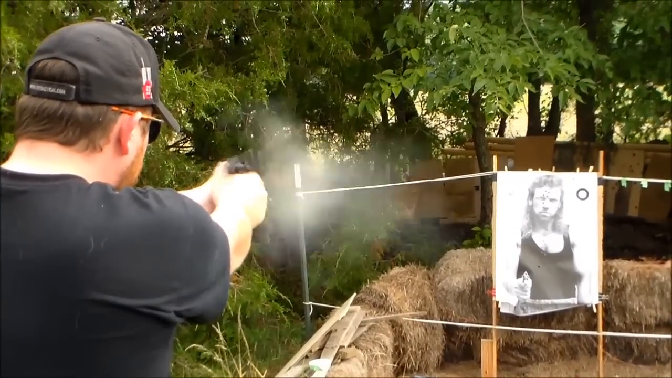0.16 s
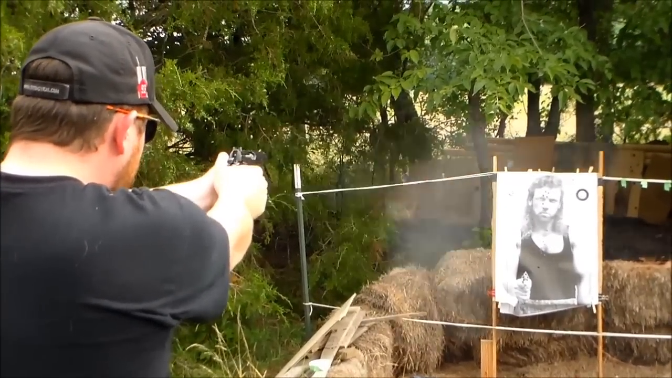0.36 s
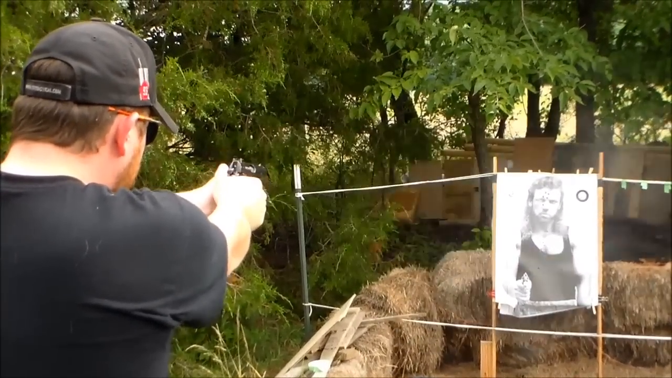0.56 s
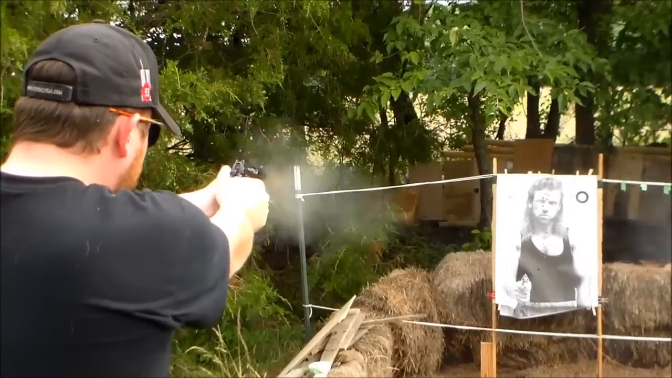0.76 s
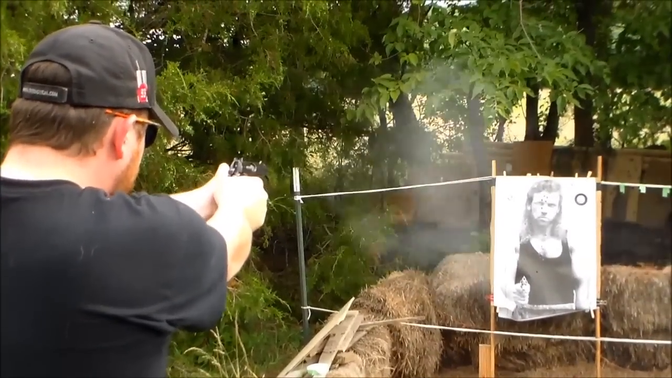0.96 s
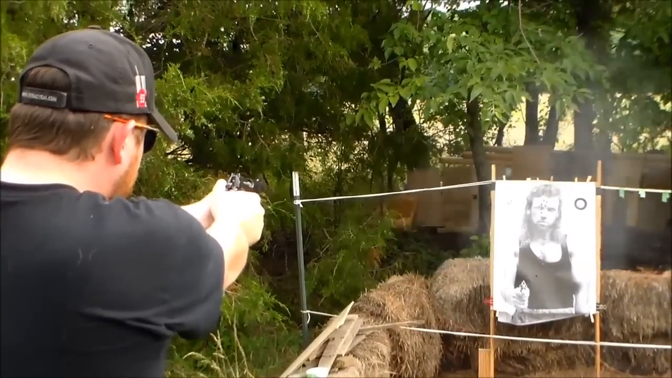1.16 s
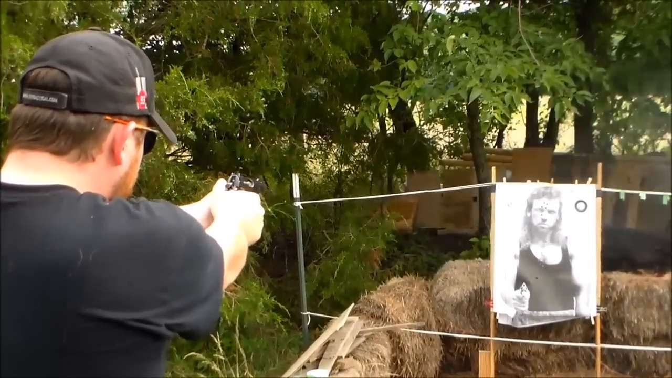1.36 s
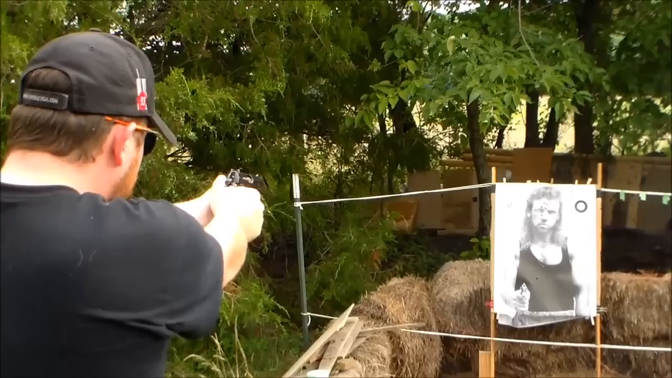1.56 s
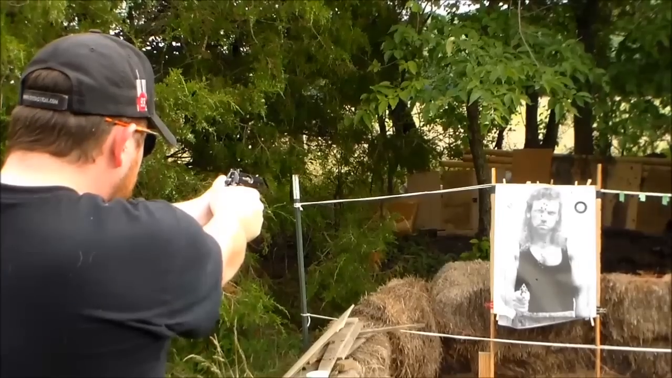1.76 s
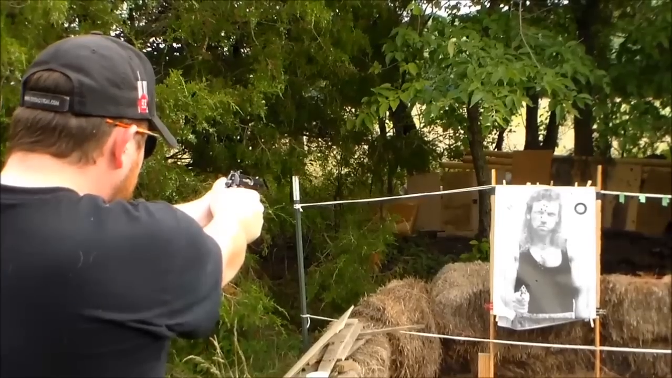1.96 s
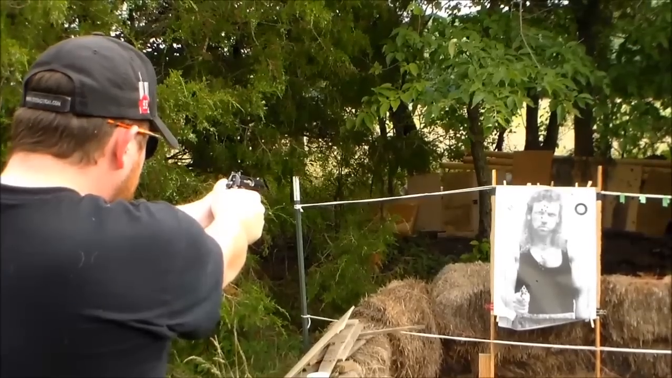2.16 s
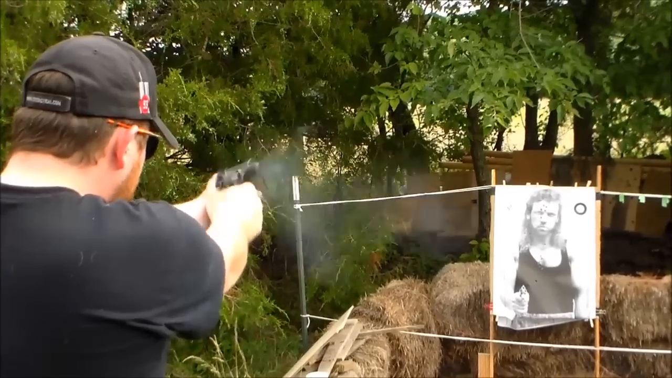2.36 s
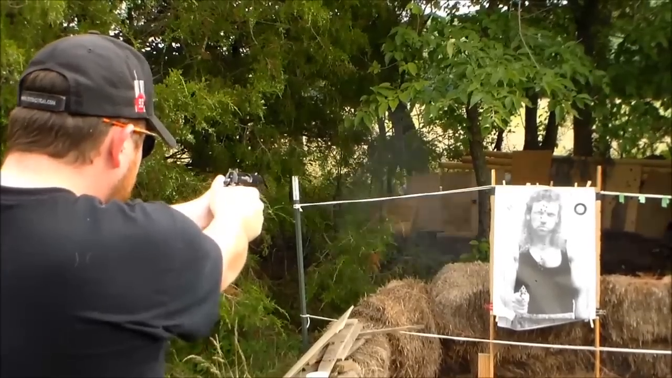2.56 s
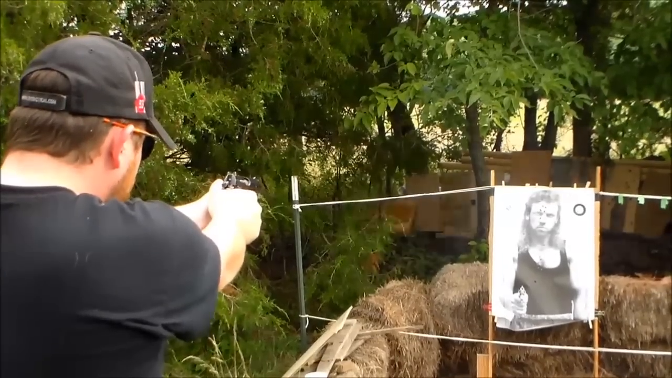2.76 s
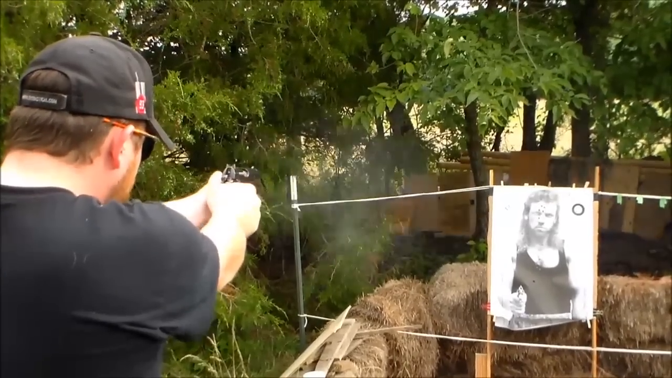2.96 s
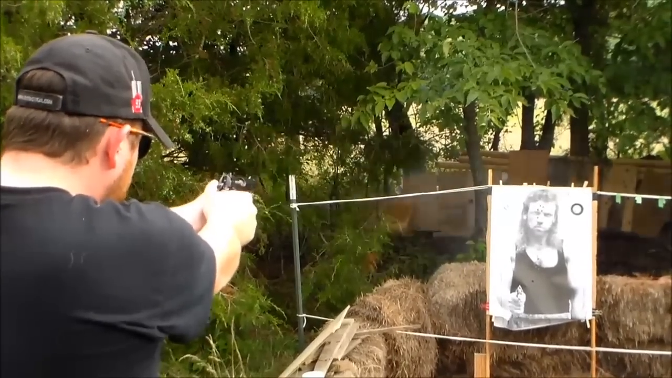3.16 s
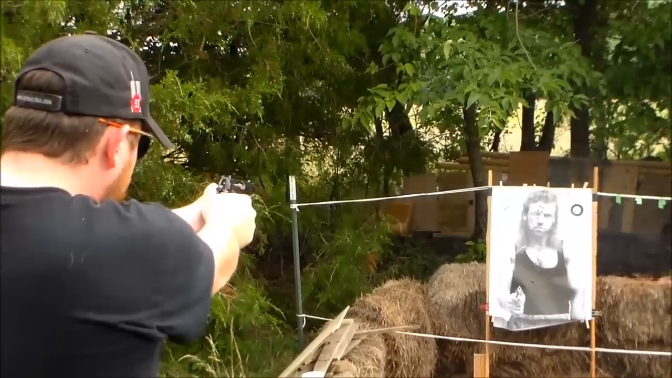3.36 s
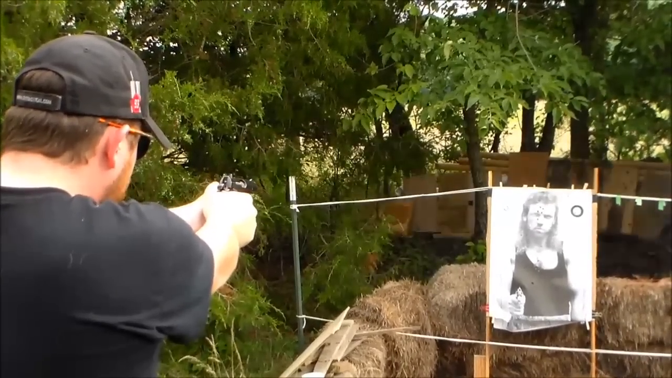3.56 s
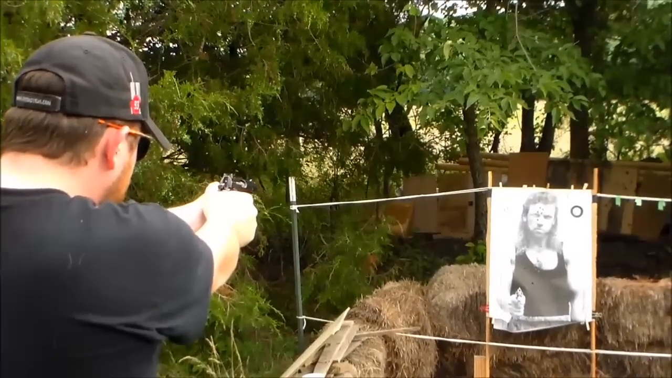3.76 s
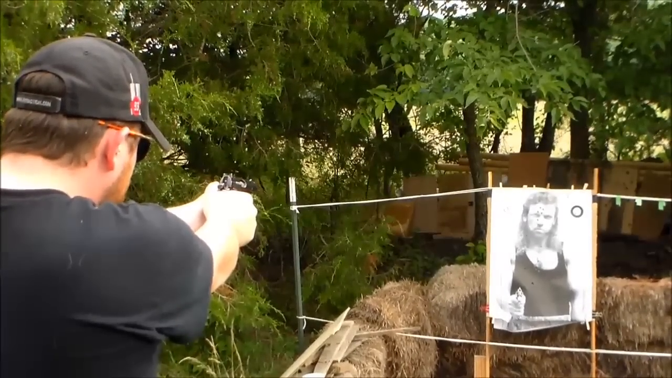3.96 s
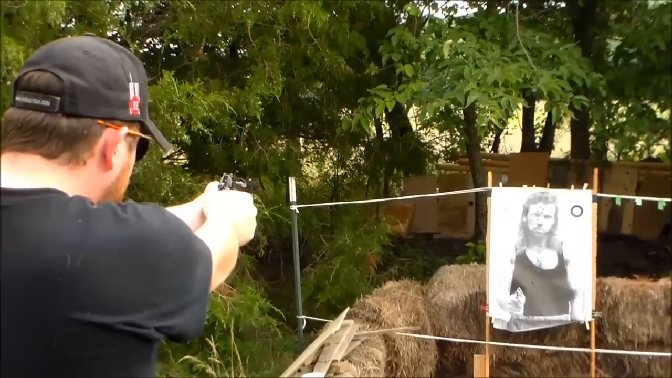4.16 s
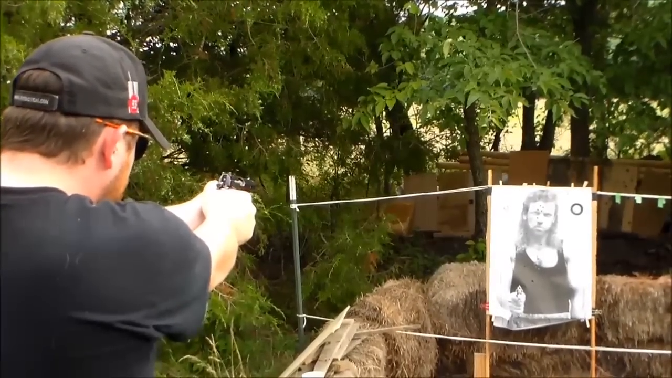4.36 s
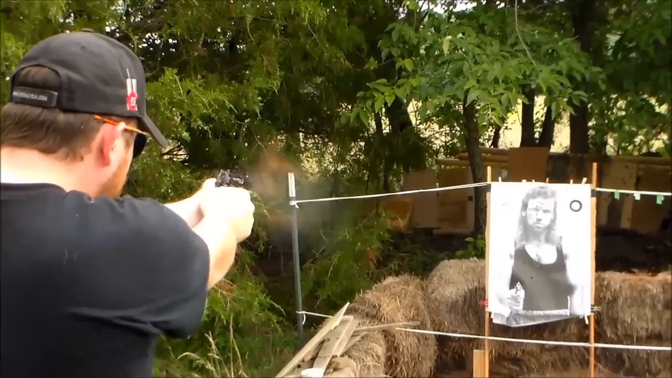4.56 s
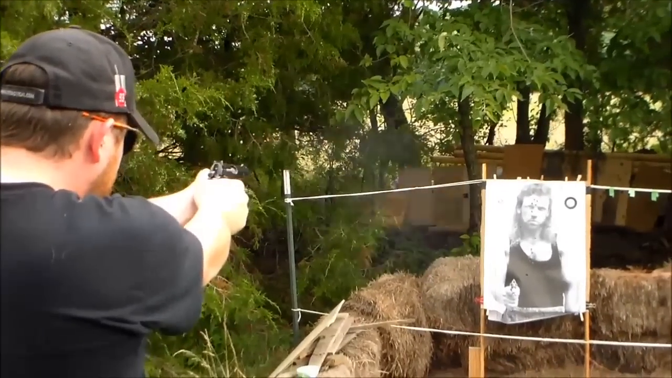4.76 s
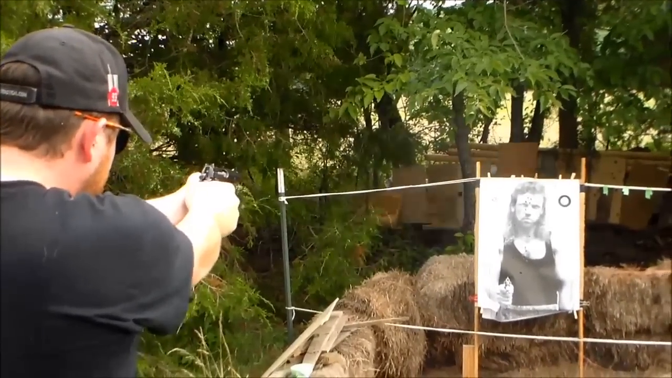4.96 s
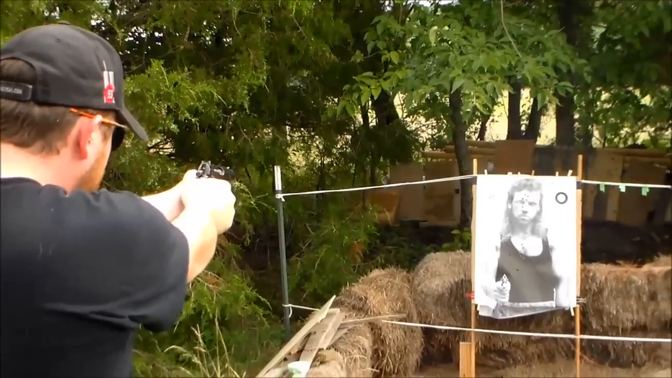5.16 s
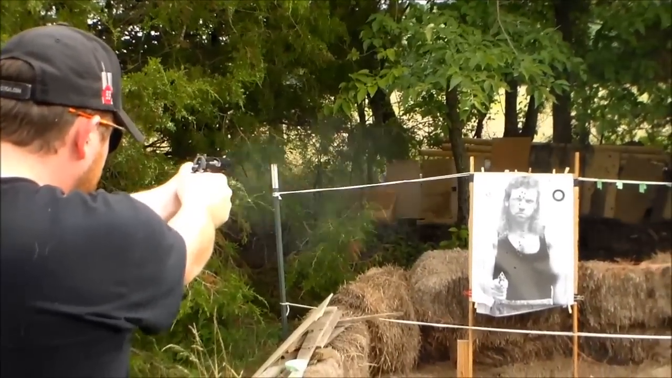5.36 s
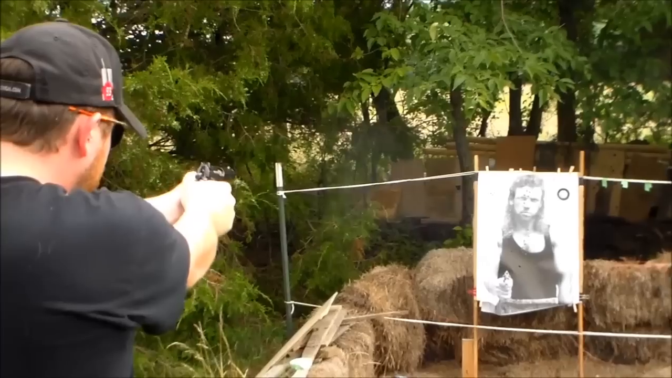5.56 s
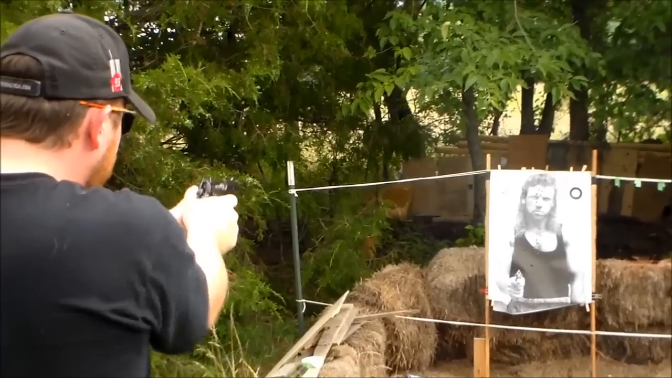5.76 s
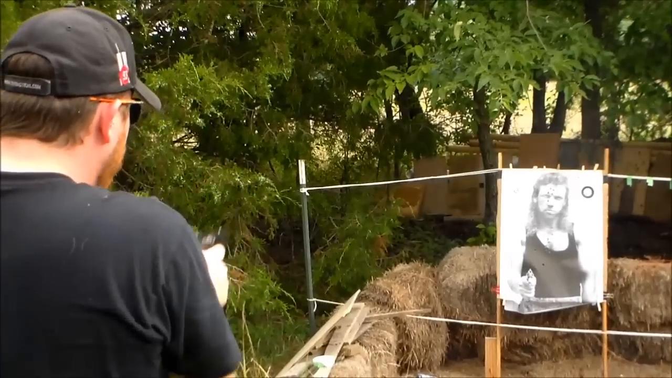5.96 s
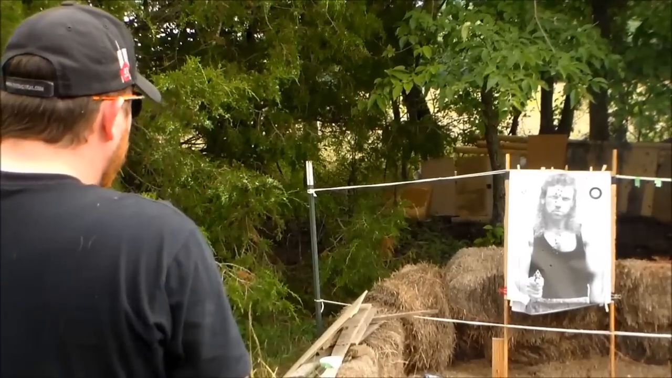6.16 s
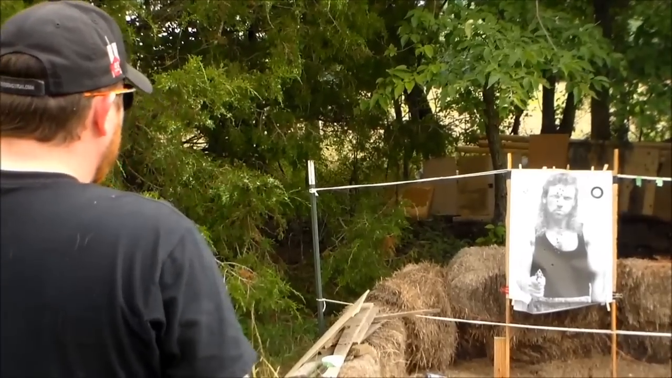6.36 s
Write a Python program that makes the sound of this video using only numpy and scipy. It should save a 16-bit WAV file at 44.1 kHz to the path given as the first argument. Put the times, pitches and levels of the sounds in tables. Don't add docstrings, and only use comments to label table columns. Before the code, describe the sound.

Six distorted handgun shots, grouped in twos, slap back from bank, trees and far wall, with light wind, leaf rustle and a faint brass tick between.

```python
import sys
import numpy as np
from scipy import signal
from scipy.fft import rfft, irfft, next_fast_len
from scipy.io import wavfile
from scipy.ndimage import uniform_filter1d

SR = 44100
rng = np.random.default_rng(int(sys.argv[2]) if len(sys.argv) > 2 else 0)


def unload_audio(sound):
    columns = np.transpose(np.atleast_2d(sound))
    steps = np.round(np.clip(columns, -1, 1) * 32767)
    wavfile.write(sys.argv[1], SR, steps.astype(np.int16))


def boost(x):
    u = np.asarray(x, float) / 20
    return 10 ** u


N = 286473

# start in seconds, input bias kick left and right in full scale,
# kick by the first echo left and right in full scale.
SHOTS = [
    (0.3418, -0.81, -0.33, 0.17, -0.14),
    (0.953, -0.26, -0.42, 0.0069, 0.0032),
    (2.53, -1.07, -0.87, 0.28, 0.34),
    (3.0816, -0.71, -0.47, 0.11, 0.06),
    (4.7554, -0.62, -0.76, 0.17, 0.21),
    (5.4909, -0.57, -0.5, 0.14, 0.064),
]
# frequency in Hz, level in dB per Hz.
BLAST = [(88, -53.5), (150, -27), (273, -19.5), (416, -8.5), (459, -9.5), (535, -3), (991, -3.5),
         (1460, -7), (2020, -13.5), (2550, -9.5), (3540, -13), (6810, -23), (11200, -25), (13900, -35),
         (15000, -61.5)]
# frequency in Hz, side minus mid in dB.
WIDTH = [(60, -9.5), (110, -18.5), (200, -10), (380, -19.5), (700, -17), (1280, -13.5), (2370, -11.5),
         (4370, -4.5), (8060, 0), (14900, 3)]
CENTRES = 125 * 2 ** np.arange(0, 7.1, .5)
LEFT_RIGHT = np.array([[1], [-1]])


def on_log(table, hz):
    table_hz, value = np.transpose(table)
    return np.interp(np.log(np.maximum(hz, 1)), np.log(table_hz), value)


def bands(table, size):
    hz = np.fft.rfftfreq(size, 1 / SR)
    octaves = np.log2(np.maximum(hz, 1) / CENTRES[:, None])
    mask = np.cos(np.pi * np.clip(octaves, -.5, .5)) * boost(on_log(table, hz))
    noise = irfft(mask * rfft(rng.standard_normal((len(CENTRES), size))), size)
    return noise / np.sqrt(np.mean(mask ** 2, axis=1).sum())


def walk(rate):
    hold = int(SR / rate)
    levels = np.repeat(rng.standard_normal(N // hold + 1), hold)
    return 0.99 * uniform_filter1d(levels, hold)[:N]


def add(out, s, sound):
    i = int(s * SR)
    out[:, i:i + sound.shape[-1]] += sound[..., :N - i]


def leaves():
    # frequency in Hz, level in dB per Hz.
    leaf_colour = [(350, -22), (500, -3), (800, -1), (1300, -6), (2000, -8.5), (2700, -10.5), (3400, -4.5),
                   (5400, -6.5), (7100, -16.5), (10000, -18), (13500, -23.5), (15000, -25.5)]
    # time in seconds, level in dB.
    rustle = [
        (0, -59.5),
        (0.501, -57),
        (2.2, -57.5),
        (4.3, -57.5),
        (6.5, -54),
    ]
    mid, side = (bands(leaf_colour, N) * boost([1.4 * walk(26) for _ in CENTRES]) for _ in range(2))
    wide = boost(on_log(WIDTH, CENTRES) + 3.0)[:, None]
    level = boost(np.interp(np.arange(N) / SR, *np.transpose(rustle)))
    return level * (mid.sum(axis=0) + LEFT_RIGHT * (wide * side).sum(axis=0))


def wind():
    # time in seconds, level in dB.
    strength = [(0.0, -41), (.15, -50.5), (.5, -46.5), (1.2, -44), (1.75, -51.5), (1.93, -50),
                (2.05, -42.5), (2.46, -41.5), (2.95, -51), (3.3, -43), (3.9, -58.5), (4.15, -46.5),
                (4.7, -45), (5.2, -47), (5.42, -43), (5.9, -51.5), (6.2, -38.5), (6.5, -36.5)]
    # centre in seconds, half length in seconds, dB over the wind (negative for
    gusts = [(0.179, 0.011, 10.5), (2.198, 0.027, 3.5), (2.28, 0.02, -12), (4.173, 0.016, 1.5),
             (4.319, 0.0083, 6.5), (4.4, 0.026, -6), (6.336, 0.033, -8)]
    # frequency in Hz, level in dB per Hz.
    rumble = [(12, -31.5), (20, 3.5), (150, -1), (198, -7.5), (248, -11.5), (300, -20.5), (400, -17),
              (520, -46), (880, -120)]
    # start in seconds, peak in dB, pitch in Hz, left minus right in dB.
    buffets = [(0.171, -37.5, 172, 21), (2.225, -36, 133, 23), (2.309, -37.5, 151, 20),
               (2.439, -43, 136, 15), (6.291, -30.5, 244, 13), (6.404, -27, 293, 21.5),
               (6.416, -46, 164, 5), (6.46, -29, 171, 14)]
    t = np.arange(N) / SR
    db = np.interp(t, *np.transpose(strength))
    for s, half, over_db in gusts:
        db = db + over_db * np.exp(-((t - s) / half) ** 2)
    pan_db = 5.5 + .6 * (db + 47)

    noise = rng.standard_normal((2, N)) + .5 * rng.standard_normal(N)
    low = irfft(rfft(noise) * boost(on_log(rumble, np.fft.rfftfreq(N, 1 / SR))), N)
    rasp = signal.sosfilt(signal.butter(2, [170, 480], "bandpass", fs=SR, output="sos"), noise)
    rasp_gain = boost(4.8 * (db + 35.5) + 1)
    lumps = boost([2.4 * walk(30), 5 * walk(28)])
    out = low / low.std() + rasp / rasp.std() * rasp_gain
    out = out * lumps * boost(db + 4.0 + LEFT_RIGHT * pan_db / 2)

    u = np.arange(SR // 20) / SR
    for when, peak_db, hz, side_db in buffets:
        flap = -np.sin(2 * np.pi * hz * u) * u * hz * np.exp(-u * hz * 2.47)
        add(out, when, flap * boost(peak_db + 20.5 + LEFT_RIGHT * side_db / 2))
    return out


def brass():
    # start in seconds, peak in dB, left minus right in dB.
    ticks = [
        (2.166, -49, -16),
        (4.3102, -68, -8.5),
    ]
    out = np.zeros((2, N))
    u = np.arange(SR // 20) / SR
    for when, peak_db, side_db in ticks:
        ring = np.sin(2 * np.pi * 9600 * u) * np.exp(-u / 0.0012)
        grit = np.diff(rng.standard_normal(len(u) + 1)) * np.exp(-u / 0.0017)
        add(out, when, (ring + 0.71 * grit) * boost(peak_db + LEFT_RIGHT * side_db / 2))
    return out


def returns(u):
    # arrival in seconds, rise in seconds, hold in seconds,
    # level in dB, decay in dB per second.
    parts = [
        (0, 0.0024, 0.0031, 35.5, 7000.5),
        (.006, .002, 0.0009, 9.5, 301.5),
        (0.028, 0.0039, .002, 5.5, 1398),
        (0.035, .016, 0.016, 5, 127.5),
        (0.247, 0.067, 0.045, -28.5, 20),
        (0.69, .1, .2, -35.5, 13),
        (.775, 0.016, 0.011, -30.5, 455),
        (0.84, 0.019, 0.023, -32.5, 700),
        (0, .0015, .0012, 25, 5998.5),
    ]
    # treble tilt and bass loss, both in dB per octave.
    colours = [(0.8, -10.5), (2.2, -10), (4.4, -3.5), (2, 1), (1.42, 7), (0.56, 7), (4, 23), (6.3, 22),
               (8, 2)]
    start, rise, hold, db, fall_db = np.transpose(parts)[:, :, None]
    onset = np.clip((u - start) / rise, 0, 1) ** 4
    decay_db = fall_db * np.maximum(u - start - rise - hold, 0)
    power = 1e-9 + onset * boost(db - decay_db) ** 2
    total = power.sum(axis=0)
    tilt, bass = np.transpose(colours) @ power / total
    leaf_tilt = 10 * np.minimum(u, .4)
    return 10 * np.log10(total), tilt - leaf_tilt, bass


def slope_db(hz, tilt, bass, delay):
    treble_db = tilt * np.log2(np.maximum(hz / 1000, 1))
    bass_db = bass * np.log2(np.clip(hz / 500, .1, 1))
    air_db = 17 * delay * (hz / 8000) ** 2
    return treble_db + bass_db - air_db


def pulse(db, size=1024):
    fold = irfft(np.log(boost(db)), size)
    fold[1:size // 2] *= 2
    fold[size // 2 + 1:] = 0
    return irfft(np.exp(rfft(fold)), size)


def echoes():
    # delay in seconds, dB over the scatter, extra tilt in dB per octave.
    slaps = [(.8107, 11, 3.5), (.8186, 0, 3.5), (.8699, 11.5, -3), (.8767, 5.5, -9)]
    bank = [(0.031, 24, -5.5), (0.0318, 17.5, -6), (.0336, 11, 0.5)]
    trunks = [(.059, 10, -3), (.068, 7.5, 0), (.078, 5, -1), (.086, 5, -2.5), (.111, 5, -4), (.121, -3, -5),
              (.137, 5, -5), (.15, 7.5, -12.5), (0.155, 6.5, -6.5)]
    far_trunks = [.055, .1604, .1669, .1846, .2176, .258, .344, .3555, .3856, .4232, .4537, .5192, .5876,
                  .7307]
    # frequency in Hz, level in dB per Hz.
    slap_colour = [(240, -23), (400, -25), (1180, 4.5), (1440, -3), (1820, -44), (2310, -1.5), (2610, 1),
                   (3160, -11), (5650, -17.5), (6360, -28), (7280, -32), (8830, -65), (14000, -50)]
    boards = np.r_[1, np.zeros(18), .35]
    ledge = np.r_[1, np.zeros(37), .6]
    hz = np.fft.rfftfreq(1024, 1 / SR)
    out = np.zeros((2, N))
    reflectors = slaps + bank + trunks + [(s, 4, -6) for s in far_trunks]
    for k, (lag, over_db, extra) in enumerate(reflectors):
        db, tilt, bass = returns(lag)
        far = k < len(slaps)
        if far:
            colour = on_log(slap_colour, hz) + slope_db(hz, extra, 0, lag - .8)
        else:
            colour = on_log(BLAST, hz) + slope_db(hz, tilt + extra, bass, lag)
        if lag < .033:
            colour = colour + 9 * np.exp(-(np.log2(np.maximum(hz, 1) / 600) / 0.5) ** 2)
        side = rng.uniform(-1.3, 1) * pulse(colour + on_log(WIDTH, hz) - 3.5)
        click = pulse(colour) + LEFT_RIGHT * side
        if far:
            click = signal.lfilter(ledge, [1], click)
            click = signal.lfilter(boards[::-1], boards, click)
        elif lag > .033:
            facets = rng.standard_normal(80) ** 3 * np.exp(-np.arange(80) / 46.0)
            click = signal.lfilter(facets, [1], click)
        click = click / np.sqrt(uniform_filter1d(click.mean(axis=0) ** 2, size=44).max())
        for shot, (shift, size) in zip(SHOTS, rng.standard_normal((len(SHOTS), 2))):
            when = min(shot[0] + lag + .00005 * shift, N / SR)
            add(out, when, click * boost(db + over_db + 1.8 * size))
    return out


def scatter():
    # frequency in Hz, share of power that repeats from shot to shot.
    repeat_share = [
        (300, 0.67),
        (1100, 0.87),
        (2200, .6),
        (4500, 0.77),
        (8000, 0.058),
    ]
    size = next_fast_len(int(2.0 * SR))
    u = np.arange(size) / SR
    db, tilt, bass = returns(u)
    lumpiness = 0.22 + 0.5 * np.exp(-(u / .5) ** 2)
    clumps_db = 2.28 * walk(160)[:size] * lumpiness * np.minimum(4000 / CENTRES[:, None], 1)
    mid_shape = boost(db + clumps_db + slope_db(CENTRES[:, None], tilt, bass, u))
    side_db = on_log(WIDTH, CENTRES)[:, None] - 0.5 - 0.8 * np.exp(-u / 0.026)
    shape = np.array([mid_shape, mid_shape * boost(side_db)])

    same = np.clip(on_log(repeat_share, CENTRES), 0, 1)[:, None]
    still = np.array([bands(BLAST, size) for _ in range(2)])
    loose = np.array([bands(BLAST, size) for _ in range(2)])
    still = (shape * np.sqrt(same) * still).sum(axis=1)
    shape = shape * np.sqrt(1 - same)
    out = np.zeros((2, N))
    for shot in SHOTS:
        reshuffled = np.roll(loose, rng.integers(size), axis=2)
        mid, side = still + np.einsum("cbt,cbt->ct", shape, reshuffled)
        add(out, shot[0] - .0008, mid + LEFT_RIGHT * side)
    return out


def scene():
    return leaves() + wind() + brass() + echoes() + scatter()


def bias(u):
    rate = 14.05
    a = rate * np.maximum(u, 0)
    slow = np.exp(-a) * (1 - 2 * a + a ** 2 / 2)
    quick = 0.17 * np.exp(-a / rate / 0.036)
    return np.clip(u / .004, 0, 1) * (slow + quick)


def top_cut(x):
    return signal.sosfilt(signal.butter(12, 15480, fs=SR, output="sos"), x)


def record(dry):
    # seconds after a shot, gain in dB.
    duck = [
        (0, -3),
        (.004, -24),
        (.64, -24.5),
        (.8, 4),
        (1.0, -6.5),
    ]
    preamp_db, hiss_db, rail = -75, -74, 0.49
    t = np.arange(N) / SR
    after, db = np.transpose(duck)
    gain_db = np.min([np.interp(t - shot[0], after, db) for shot in SHOTS], axis=0)
    x = dry + boost(preamp_db) * rng.standard_normal((2, N))
    x = x * boost(gain_db) + boost(hiss_db) * rng.standard_normal((2, N))
    for s, left, right, left_echo, right_echo in SHOTS:
        x = x + np.outer([left, right], bias(t - s - .003))
        x = x + np.outer([left_echo, right_echo], bias(t - s - .031))
    x = rail * x / (rail ** 4 + x ** 4) ** (1 / 4)
    mix = signal.sosfilt(signal.ellip(6, .5, 54, 14000, fs=SR, output="sos"), x)
    return top_cut(mix)


dry = scene()
out = record(dry)
unload_audio(out)
```